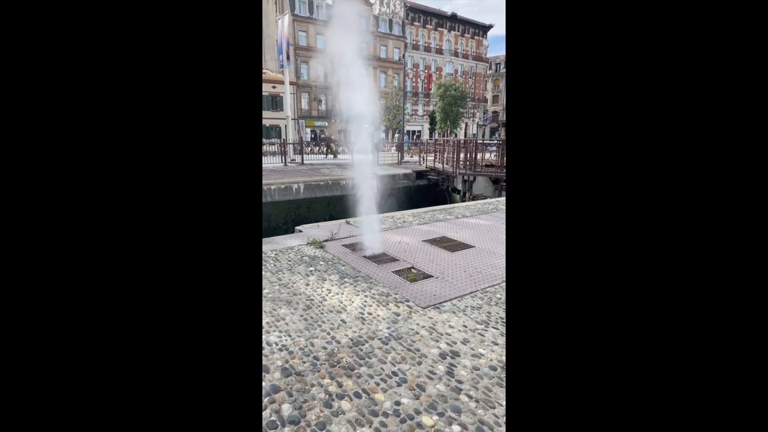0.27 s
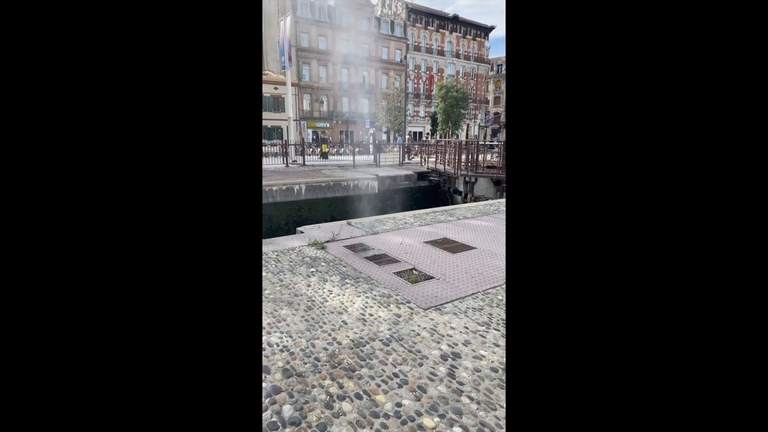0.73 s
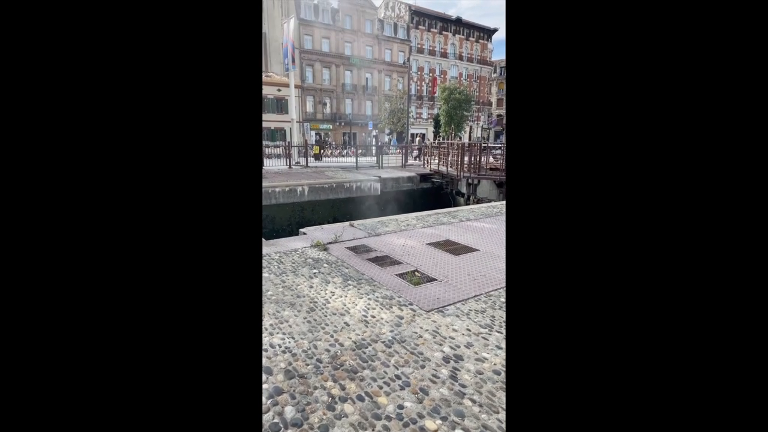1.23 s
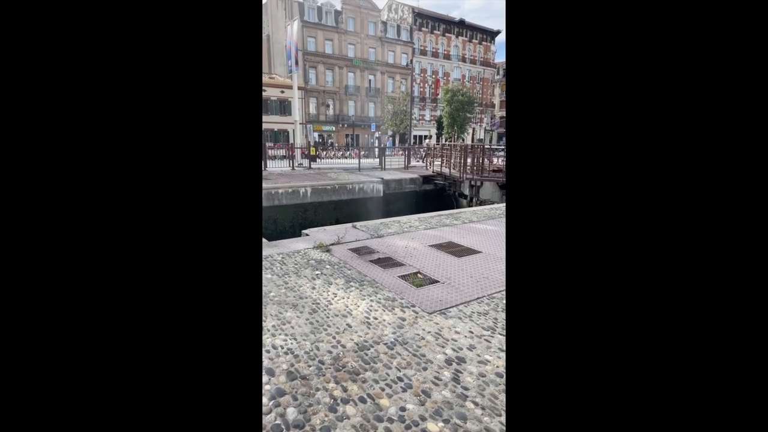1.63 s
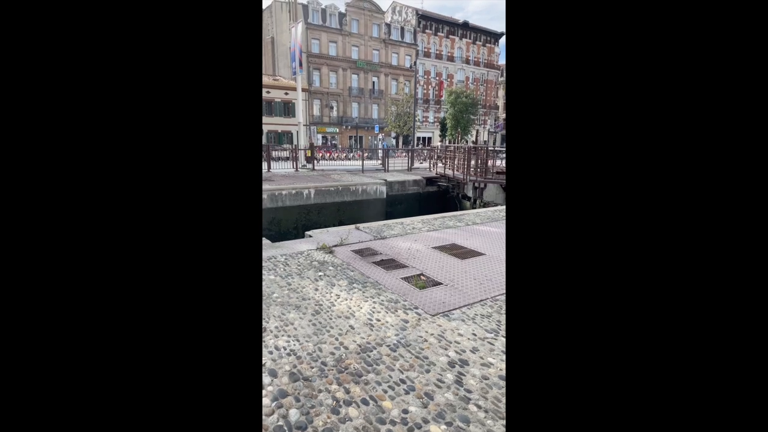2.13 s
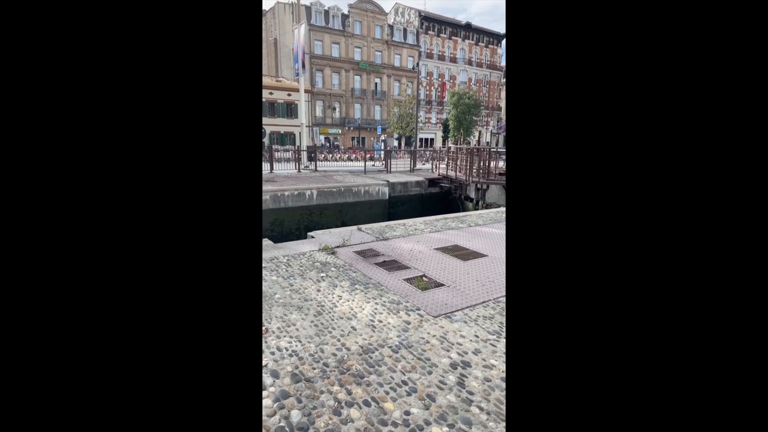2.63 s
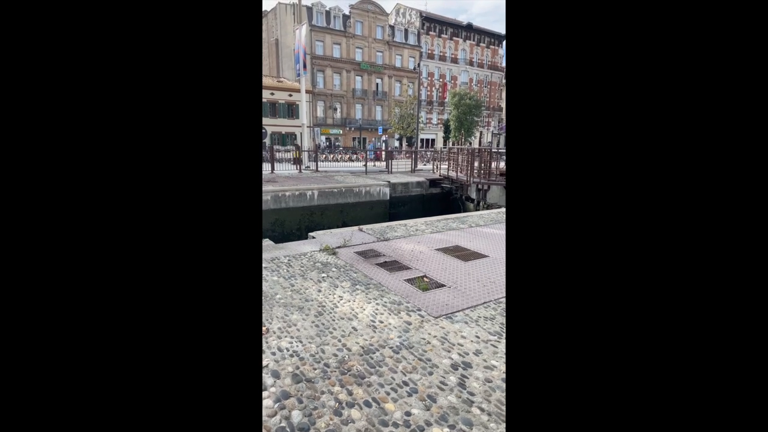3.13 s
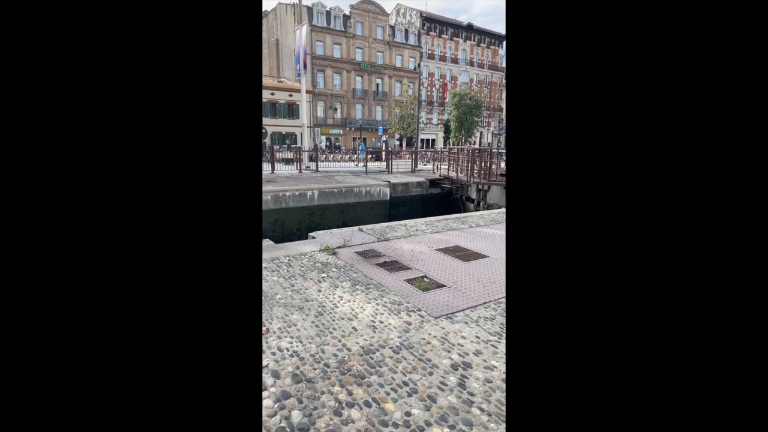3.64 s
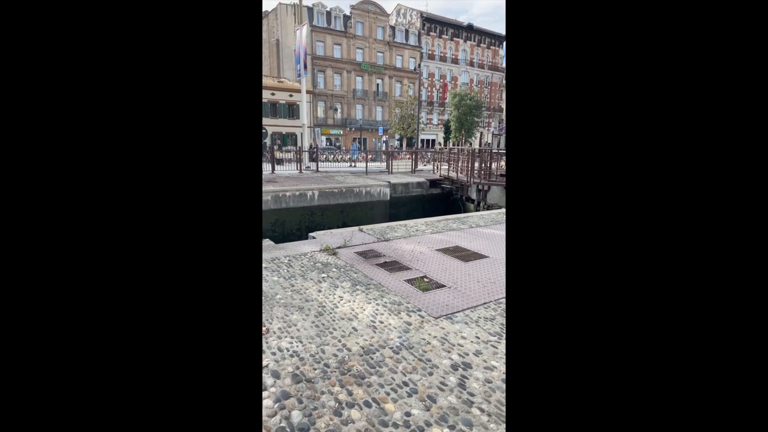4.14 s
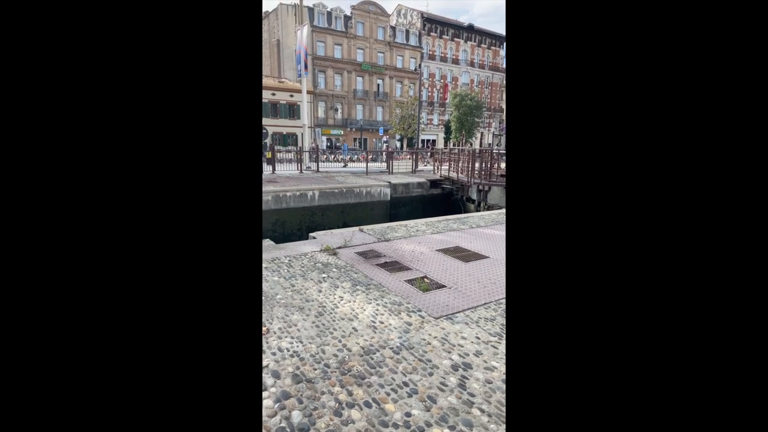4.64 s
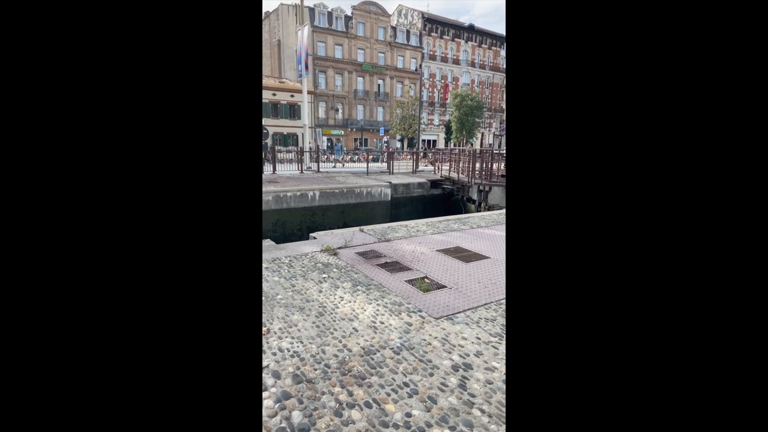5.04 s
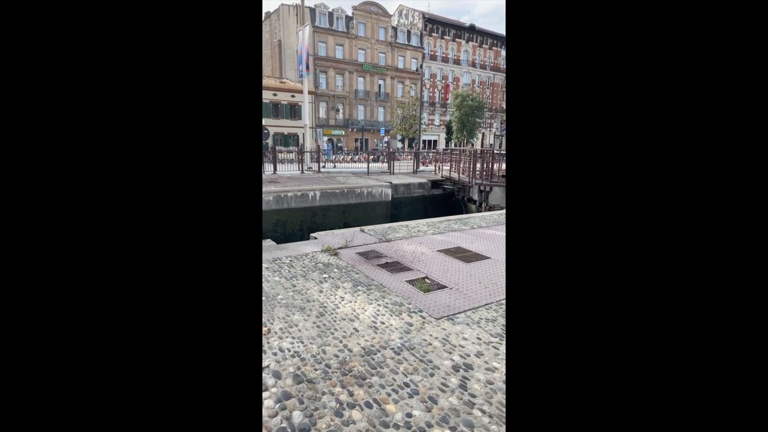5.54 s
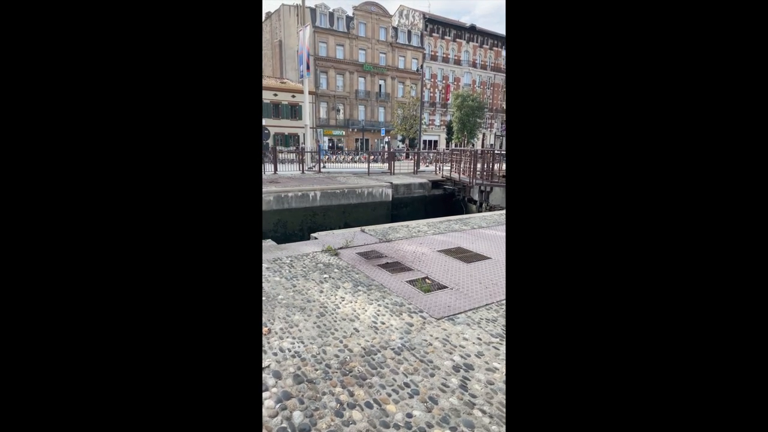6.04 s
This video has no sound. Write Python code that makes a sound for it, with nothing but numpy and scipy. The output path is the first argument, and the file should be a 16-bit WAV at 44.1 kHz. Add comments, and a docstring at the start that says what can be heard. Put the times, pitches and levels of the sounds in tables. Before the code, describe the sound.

A handheld stereo microphone faces a nearby spray of mist on an open canal bank. Broad, fizzy hiss with a rushing lower body peaks early, drops to quiet street wash, then comes back in a brief weak puff and a fuller swell, falling at the end. Soft, low wind thumps crowd the first second and a half and recur sparsely; a distant engine-like drone rises late.

```python
"""Mist jets under paving grates hiss up beside a canal in a near first surge, with low gusts at the microphone.
The hiss dies away near 3 s, returns in weaker surges and sinks again at the end; gusts go on throughout.
Behind, a street makes a steady wash and a low drone fades, returns and is loudest late.
Jets, gusts and street are shaped noise in the sum and difference of two microphone ports; thumps and
drone are low tones."""
import sys
import numpy as np
from scipy import signal
from scipy.io import wavfile
from scipy.ndimage import uniform_filter1d

SR = 44100
rng = np.random.default_rng(int(sys.argv[2]) if len(sys.argv) > 2 else 0)


def file_out(sig):
    """Save sig as 16-bit WAV at sys.argv[1]."""
    # one column per channel
    cols = np.atleast_2d(sig).T
    # limit, then scale
    lim = np.clip(cols, -1, 1)
    pcm = np.round(lim * 32767).astype(np.int16)
    wavfile.write(sys.argv[1], SR, pcm)


N = 276948
FRAME, HOP = 1024, 256  # samples
HZ = np.fft.rfftfreq(FRAME, 1 / SR)
T = np.arange(N // HOP + 4) * HOP / SR  # frame times, s

# Port pair, difference against sum. Each row: frequency in Hz, likeness 0-1 before the source's factor,
# lead in radians.
PORT_LIKENESS = [(170, 0.51, -1.4), (345, 0.83, -1.0), (600, 0.74, -1.6), (950, 0.81, -2.4),
                 (1120, 0.54, -3.9), (1290, 0.88, -4.0), (1900, 0.88, -3.3), (2240, 0.66, -3.2),
                 (2420, 0.58, -3.9), (2700, 0.89, -4.6), (3500, 0.68, -5.1), (3900, 0.23, -2.1),
                 (4150, 0.65, -3.1), (4450, 0.48, -2.9), (4720, 0.32, -2.9), (5000, 0.69, -2.2),
                 (5300, 0.46, -2.6), (5550, 0.48, -3.8), (6100, 0.67, -4.7), (9000, 0.68, -4.7),
                 (10300, 0.21, -4.5)]

# Street spectrum in the sum. Each row: frequency in Hz, relative density in dB per Hz.
STREET_SUM = [(18, -32), (30, 1), (126, -4.5), (270, -5.5), (314, -10.5), (540, -9), (596, -6.5),
              (675, -7.5), (1160, -18), (1900, -18.5), (2700, -33), (4200, -40), (4550, -48), (4680, -66),
              (4820, -49), (11000, -67), (14300, -92), (22000, -120)]
# Street spectrum in the difference. Each row: frequency in Hz, relative density in dB per Hz.
STREET_DIFFERENCE = [(18, -30), (30, 4.5), (228, -8.5), (549, -10.5), (607, -4), (671, -14), (929, -9),
                     (1500, -18), (2120, -19), (12000, -60), (15600, -100), (22000, -120)]
STREET_DB, STREET_DIFFERENCE_DB = -49, 2.5

# Distant drone, perhaps an idling engine. Each row: time in seconds, level in dB.
DRONE_LEVEL = [(0, -45), (1.6, -48), (2.6, -61), (3.4, -47), (4.3, -50), (4.7, -48), (5.3, -41),
               (5.75, -40), (5.9, -43), (6.28, -49)]
DRONE_HZ, DRONE_WAVER_HZ = 63.5, 3.8

# Moving-air spectrum before a further treble roll-off. Each row: frequency in Hz, relative density in dB per Hz.
GUST_SPECTRUM = [(12, -45), (20, -22), (49, 2.5), (69, -4), (123, -8), (211, -10.5), (268, -6), (348, -14),
                 (400, -6), (520, -48), (880, -120)]
# Steady moving air at the microphone. Each row: time in seconds, level in dB.
STEADY_AIR = [(0, -31), (.3, -29), (.48, -34), (.65, -27), (.8, -30), (1.0, -21), (1.2, -30.5), (1.44, -31),
              (1.5, -48), (1.9, -45.5), (2.3, -45), (3.0, -50.5), (3.3, -48), (3.5, -46.5), (3.65, -40),
              (4.05, -43.5), (4.35, -42), (4.6, -37), (5.2, -41), (6.28, -38.5)]
# Gusts that stand out. Each row: peak time in seconds, reference peak in dB, upper rumble relative to
# the lower in dB, thump pitch in Hz.
SINGLE_GUSTS = [(.19, -31, -5, 72), (0.328, -22, -3, 58.7), (0.407, -21.5, -4, 74), (0.541, -26.5, -2, 83),
                (0.731, -29, 4, 94), (0.901, -17.5, -11, 64), (1.0, -19.5, 0, 125), (1.097, -26, -4, 69),
                (1.339, -25, 8, 78), (1.449, -31, -5, 87), (2.299, -38, 11, 70), (2.54, -37.5, -10, 67),
                (3.11, -50, -3, 70), (3.199, -42, 13, 110), (3.29, -43, 17, 99), (3.87, -37, 4, 70),
                (4.03, -42, 8, 137), (4.509, -46, 19, 91), (4.819, -29.5, 2, 62), (5.393, -32.5, -6, 87),
                (5.718, -33, -14, 62), (6.1, -28, 2, 55.7), (6.241, -36.5, -10, 113)]
GUST_SLOPE_DB_PER_S = 386  # rise and fall
GUST_DIFFERENCE_DB, UPPER_SWING_DB = -21, 2
RUMBLE_DB, THUMP_DB = -7, -1  # relative to the reference peak
THUMP_S, THUMP_LEAN_DB = .025, 1.5  # swell width; largest chance lean to one port
BOOM_HZ, BOOM_WIDTH_HZ, BOOM_DB = 63.7, 8.1, -29  # low note that the gusts favour

# Jet strength. Each row: time in seconds, fizz level in dB.
FIZZ_LEVEL = [(0.0, -44), (0.21, -35.5), (0.44, -40), (1.14, -29.5), (1.31, -31), (1.63, -28.5),
              (1.84, -40), (2.04, -40), (2.43, -50.5), (2.69, -62.5), (3.2, -73.5), (3.45, -72.5),
              (3.7, -56.5), (3.9, -43.5), (4.04, -43.5), (4.2, -50), (4.65, -49), (4.95, -44.5),
              (5.12, -39), (5.56, -34), (6.09, -42.5), (6.28, -53.5)]
# Low roar, swelling over a narrower range than the fizz. Each row: time in seconds, level in dB.
ROAR_LEVEL = [(0, -37), (.28, -31.5), (.5, -36), (1.6, -32), (1.8, -38.5), (2.05, -37.5), (2.2, -45),
              (2.35, -41), (2.5, -49.5), (3.1, -54), (3.25, -46.5), (3.4, -50.5), (3.75, -43.5),
              (4.05, -38), (4.2, -42.5), (4.55, -39.5), (5.0, -42), (5.15, -38), (5.55, -33.5),
              (6.28, -38.5)]
# Spray spectrum in the sum. Each row: frequency in Hz, relative density in dB per Hz.
SPRAY_SUM = [(70, -22), (170, -8.5), (240, 1), (340, 2.5), (450, -1.5), (620, -7), (800, -3), (1450, -4),
             (2000, -7.5), (2800, -4.5), (3700, -11), (4300, -8), (4700, -4.5), (5300, -7), (7000, -10),
             (9000, -13.5), (10000, -20.5), (10600, -32), (11300, -35)]
# Spray spectrum in the difference. Each row: frequency in Hz, relative density in dB per Hz.
SPRAY_DIFFERENCE = [(150, -21), (430, -2.5), (600, -7.5), (830, 2.5), (1200, -3), (1900, -11), (2700, -2),
                    (3300, -5.5), (3900, -16.5), (4800, -2), (5400, -15.5), (8500, -11), (10500, -18),
                    (16000, -16)]
# Dips where the ports cancel the spray. Each row: frequency in Hz, width in Hz, depth in dB before aim,
# waver in Hz.
CANCELLATION_DIPS = [(630, 60, 11, 12), (1092, 72, 23.5, 23), (2410, 170, 14, 35), (4690, 190, 29, 38)]
# How squarely the spray comes from one direction. Each row: time in seconds, depth factor of the three lower
# dips, depth factor of the top dip.
SPRAY_AIM = [(0, .75, 1.15), (.45, .8, 1.3), (1.0, 1.0, 1.4), (1.5, 1.0, 1.45), (1.6, 1.35, 1.45),
             (1.7, 1.2, 1.1), (1.85, .75, .9), (2.25, .7, 1.0), (2.32, .65, 1.25), (2.83, .5, 1.25),
             (2.92, .4, .6), (3.1, .3, .4), (3.6, .45, .45), (4.3, .85, .78), (6.28, .8, .7)]
FIZZ_HZ, RUSH_HZ, ROAR_HZ = 7100, 1660, 300
FIZZ_BAND_HZ = 5133, 10500
EVEN_DB = -36  # level where rush and fizz balance as in the spectra
RUSH_DB_PER_FIZZ_DB = 0.6
FLOOR_DB, FLOOR_HZ = 40, 100  # greatest extra depth and half-width of a dip's flat bottom

LOW_CUT_HZ, SUM_EDGE_HZ, EDGE_HZ = 52.8, 10950, 15780


def gain_of(db):
    """Turns dB into an amplitude factor."""
    return 10 ** (np.asarray(db) / 20)


def evened(x):
    """Scales to an rms of 1."""
    return x / np.sqrt(np.mean(abs(x) ** 2) + 1e-20)


def drifting(shape, frames):
    """Slow chance drift: random values smoothed along the last axis, rms 1."""
    return evened(uniform_filter1d(rng.standard_normal(shape), size=frames, axis=-1))


def level_at(times_s, table):
    """Reads a level table at the given times."""
    return np.interp(times_s, *np.transpose(table))


def spectrum(table, column=1):
    """Reads a table over log frequency at every bin."""
    table = np.array(table)
    return np.interp(np.log(HZ + 1), np.log(table[:, 0] + 1), table[:, column])


def band_db(shape_db, lo_hz, hi_hz):
    """Summed power of a spectrum between two frequencies, in dB."""
    band = (HZ >= lo_hz) & (HZ < hi_hz)
    return 10 * np.log10(np.sum(gain_of(shape_db[band]) ** 2))


def port_noise(sum_db, difference_db, likeness, patchy_db, rough_db):
    """Turbulence: two noises coloured in short frames with drifting patches, partly alike in sum and difference."""
    white = rng.standard_normal((2, N + FRAME))
    white *= gain_of(rough_db * drifting(N + FRAME, 30))
    frames = signal.stft(white, nperseg=FRAME, noverlap=FRAME - HOP)[2][:, :, :len(T)]
    first, second = evened(frames)

    patches = rng.standard_normal((len(HZ), len(T)))
    patches = uniform_filter1d(patches, size=14, axis=0)  # bins
    patches = evened(uniform_filter1d(patches, size=12, axis=1))  # frames
    mid = first * gain_of(patchy_db * patches)

    same = np.clip(likeness * spectrum(PORT_LIKENESS, column=1), 0, 1)[:, None]
    lead = np.exp(1j * spectrum(PORT_LIKENESS, column=2))[:, None]
    side = same * lead * mid + np.sqrt(1 - same ** 2) * second

    coloured = np.array([mid * gain_of(sum_db), side * gain_of(difference_db)])
    mid, side = signal.istft(coloured, nperseg=FRAME, noverlap=FRAME - HOP)[1][:, :N] / .866  # level trim
    return np.array([mid + side, mid - side])


def street():
    """Far traffic and water: a dull steady wash of noise, little alike in sum and difference."""
    sum_db = spectrum(STREET_SUM)
    level_db = STREET_DB - band_db(sum_db, 30, 11000)
    difference_db = spectrum(STREET_DIFFERENCE) + level_db + STREET_DIFFERENCE_DB
    return port_noise((sum_db + level_db)[:, None], difference_db[:, None],
                      likeness=0.15, patchy_db=2.0, rough_db=2.3)


def drone():
    """A low sine of wavering pitch that follows its level table, alike at both ports."""
    t = np.arange(N) / SR
    hz = DRONE_HZ + DRONE_WAVER_HZ * np.interp(t, T, drifting(len(T), 10))
    phase = 2 * np.pi * np.cumsum(hz) / SR
    return np.sqrt(2) * gain_of(level_at(t, DRONE_LEVEL)) * np.sin(phase)


def gusts():
    """Low rumble of moving air, nearly alike at both ports, with a soft resonant boom."""
    shape_db = spectrum(GUST_SPECTRUM)
    shape_db = shape_db - 30 * np.clip(np.log2(HZ / 170 + 1e-9), 0, 9)  # 30 dB per octave above 170 Hz
    upper = np.clip((HZ[:, None] - 60) / 50, 0, 1)

    steady_db = level_at(T, STEADY_AIR) + upper * UPPER_SWING_DB * drifting(len(T), 8)
    power = gain_of(steady_db) ** 2
    for peak_s, peak_db, upper_db, _ in SINGLE_GUSTS:
        gust_db = peak_db + RUMBLE_DB + upper * upper_db - GUST_SLOPE_DB_PER_S * abs(T - peak_s)
        power = power + gain_of(gust_db) ** 2

    sum_db = shape_db[:, None] - band_db(shape_db, 40, 160) + 10 * np.log10(power)
    air = port_noise(sum_db, sum_db + GUST_DIFFERENCE_DB, likeness=0.95, patchy_db=0.5, rough_db=1.3)
    boom = signal.lfilter(*signal.iirpeak(BOOM_HZ, BOOM_HZ / BOOM_WIDTH_HZ, SR), air)
    return air + gain_of(BOOM_DB) * boom


def thumps():
    """Each single gust pushes the microphone membranes through a few low cycles under a rounded swell."""
    t = np.arange(N) / SR
    out = np.zeros((2, N))
    for peak_s, peak_db, _, hz in SINGLE_GUSTS:
        phase, lean = rng.random(2)
        near = slice(max(round((peak_s - .15) * SR), 0), round((peak_s + .15) * SR))
        u = t[near] - peak_s
        lean_db = THUMP_LEAN_DB * (2 * lean - 1) * np.array([[1], [-1]])
        swell = np.sqrt(2) * np.exp(-.5 * (u / THUMP_S) ** 2)
        cycles = np.cos(2 * np.pi * (hz * u + phase))
        out[:, near] += gain_of(peak_db + THUMP_DB + lean_db) * swell * cycles
    return out


def dips_db():
    """Sharp cancellations in the sum, wavering in frequency and depth as the spray shifts about."""
    drift = drifting((len(CANCELLATION_DIPS), len(T)), 9)
    depth = drifting((len(CANCELLATION_DIPS), len(T)), 9)
    aim_s, lower, top = np.transpose(SPRAY_AIM)
    aim = np.array([np.interp(T, aim_s, factor) for factor in (lower, lower, lower, top)])
    aim *= np.clip(1 + .19 * depth, 0, 3)
    # the upper two dips deepen and flatten at the bottom once aim passes 1
    flat = np.clip(5 * (aim - 1), 0, 1) * np.array([[0], [0], [.5], [1]])

    total_db = 0
    for i, (hz, width_hz, depth_db, waver_hz) in enumerate(CANCELLATION_DIPS):
        off_hz = abs(HZ[:, None] - hz - waver_hz * drift[i])
        total_db = total_db - aim[i] * depth_db * np.exp(-off_hz / width_hz)
        total_db = total_db - flat[i] * FLOOR_DB * np.exp(-(off_hz / FLOOR_HZ) ** 4)
    return total_db


def jets():
    """Spray noise: fizz, rush and roar swell by different amounts; the treble flickers from frame to frame."""
    octave = np.log2(HZ[:, None] + 1)
    to_fizz = np.clip((octave - np.log2(RUSH_HZ)) / np.log2(FIZZ_HZ / RUSH_HZ), 0, 1)
    to_roar = np.clip((np.log2(RUSH_HZ) - octave) / np.log2(RUSH_HZ / ROAR_HZ), 0, 1)
    to_rush = 1 - to_fizz - to_roar

    fizz_db = level_at(T, FIZZ_LEVEL)
    rush_db = EVEN_DB + RUSH_DB_PER_FIZZ_DB * (fizz_db - EVEN_DB)
    blend_db = to_fizz * fizz_db + to_rush * rush_db + to_roar * level_at(T, ROAR_LEVEL)

    flicker_db = 0.55 * to_fizz * rng.standard_normal(len(T))
    slow_swing_db = 0.5 * (1 - to_fizz) * drifting(len(T), 14)
    sum_db = spectrum(SPRAY_SUM)
    level_db = blend_db + flicker_db + slow_swing_db - band_db(sum_db, *FIZZ_BAND_HZ)
    return port_noise(sum_db[:, None] + dips_db() + level_db,
                      spectrum(SPRAY_DIFFERENCE)[:, None] + level_db,
                      likeness=1.11, patchy_db=1.0, rough_db=0.0)


def scene():
    """All sources together."""
    return street() + drone() + gusts() + thumps() + jets()


def low_pass(hz):
    """A steep low-pass kernel."""
    return signal.firwin(511, hz, window=("kaiser", 9), fs=SR)


def record(dry):
    """A low cut; the sum of the ports loses its highest treble; then a band limit on both channels."""
    low_cut = signal.butter(4, LOW_CUT_HZ, "high", fs=SR, output="sos")
    left, right = signal.sosfilt(low_cut, dry)
    mid = signal.oaconvolve((left + right) / 2, low_pass(SUM_EDGE_HZ), "same")
    side = (left - right) / 2
    return signal.oaconvolve(np.array([mid + side, mid - side]), low_pass(EDGE_HZ)[None], "same")


dry = scene()
out = record(dry)
file_out(out)
```